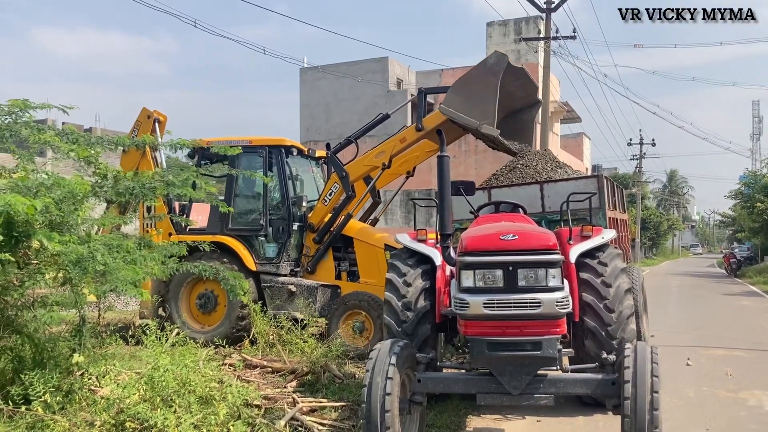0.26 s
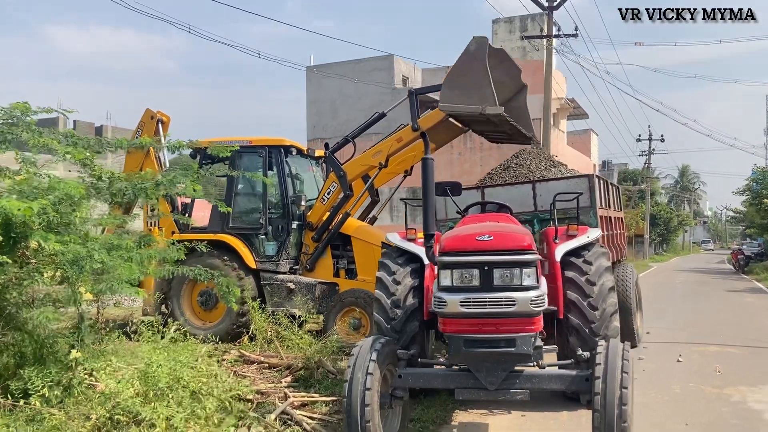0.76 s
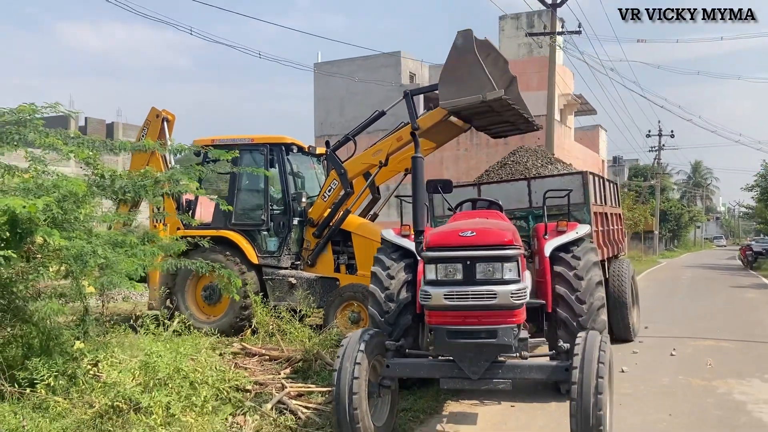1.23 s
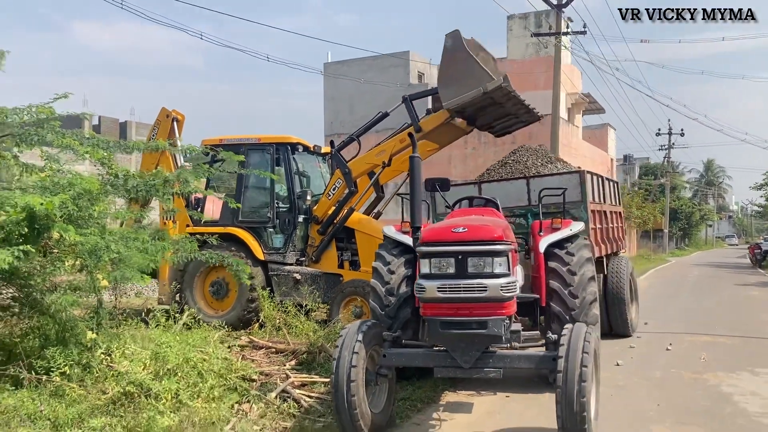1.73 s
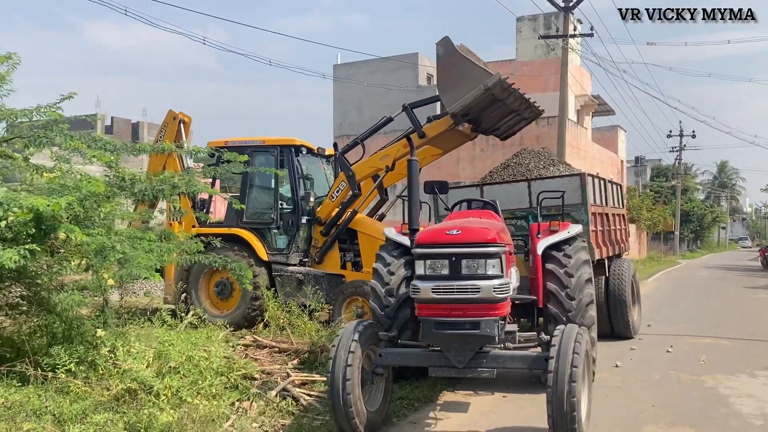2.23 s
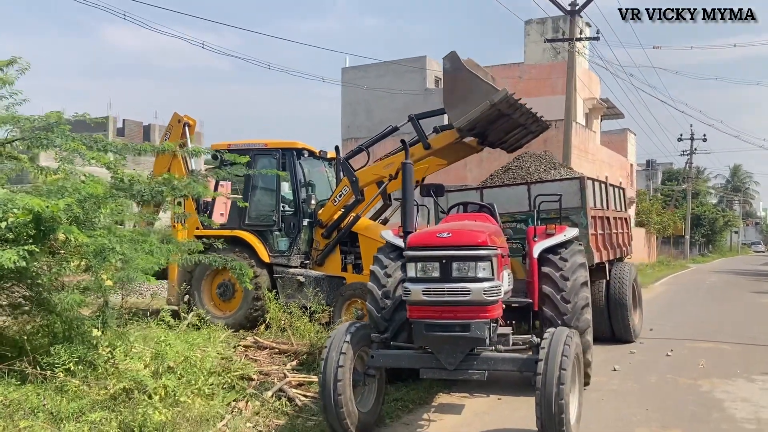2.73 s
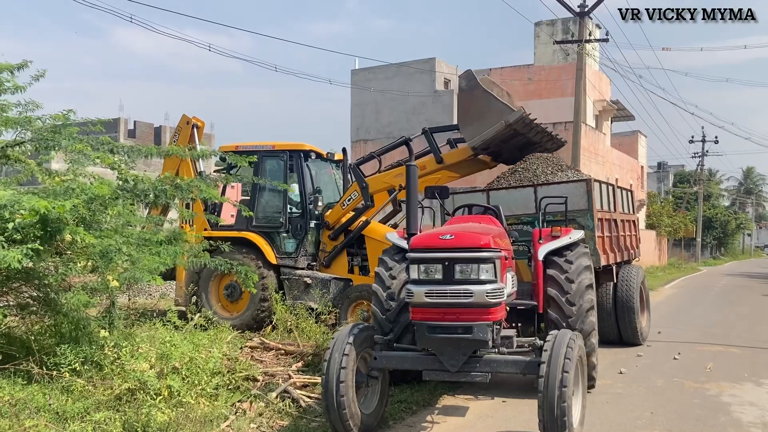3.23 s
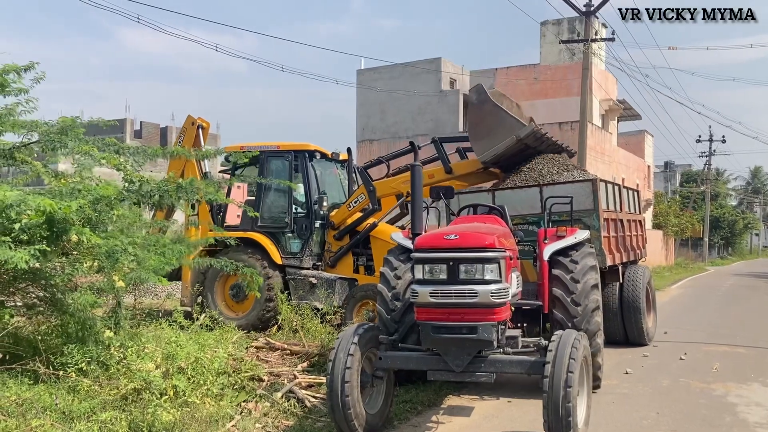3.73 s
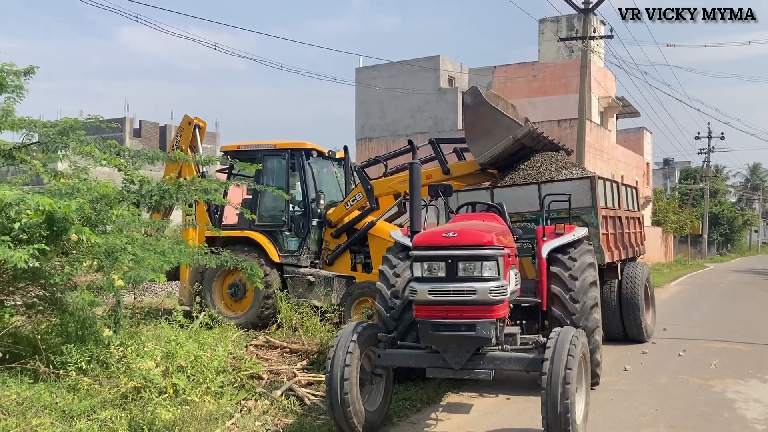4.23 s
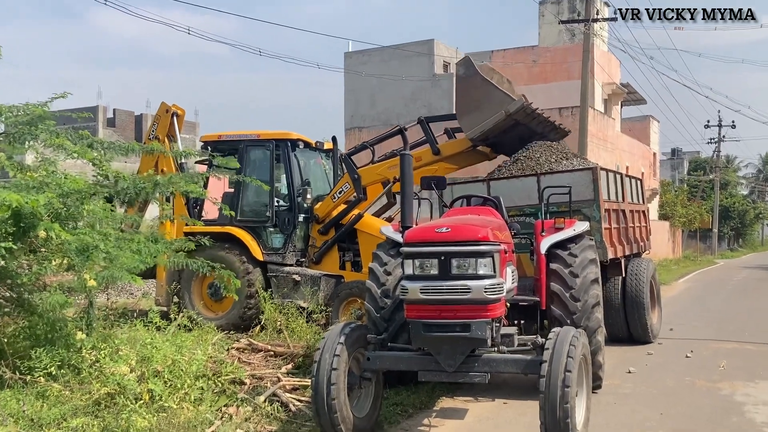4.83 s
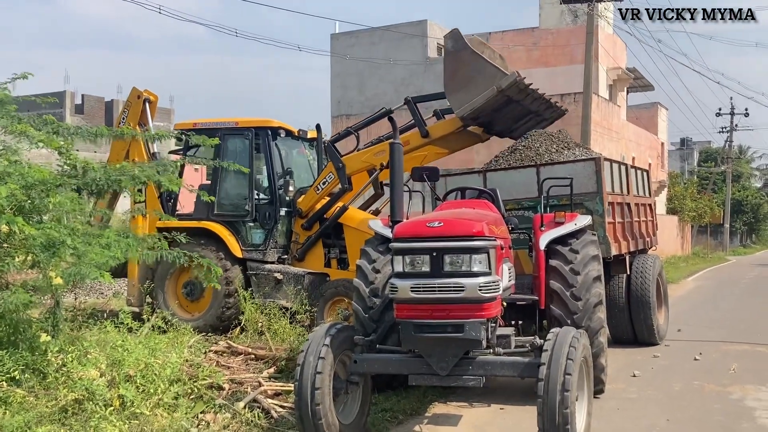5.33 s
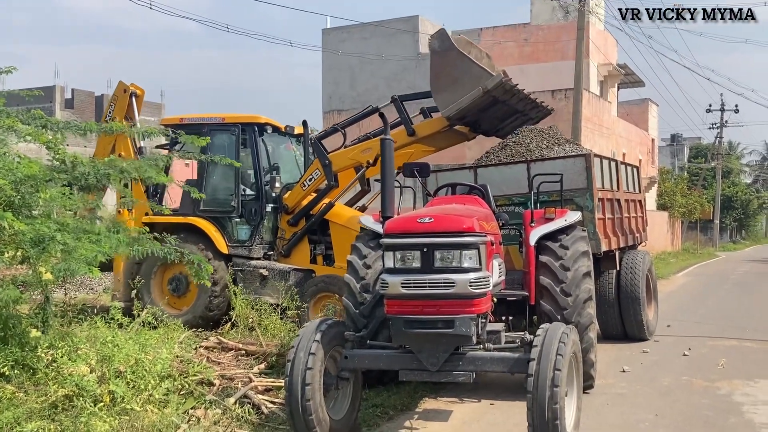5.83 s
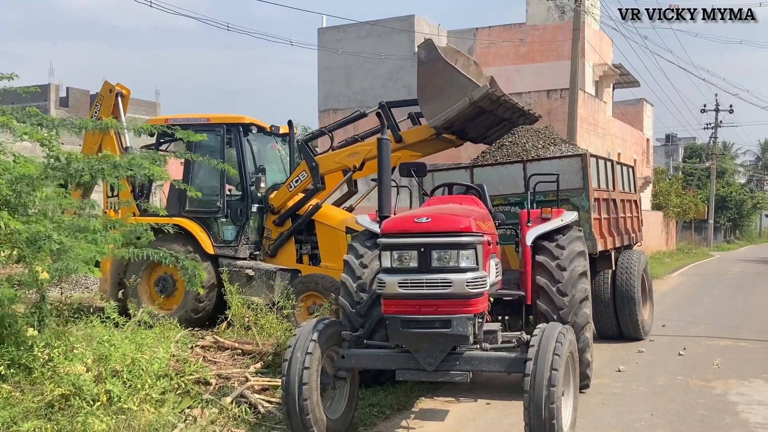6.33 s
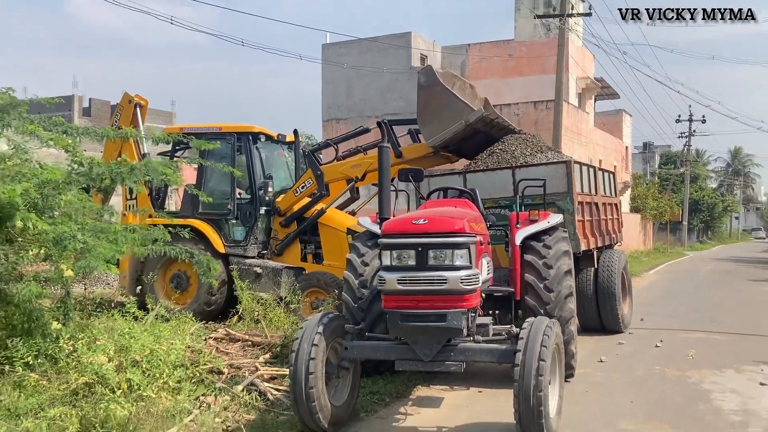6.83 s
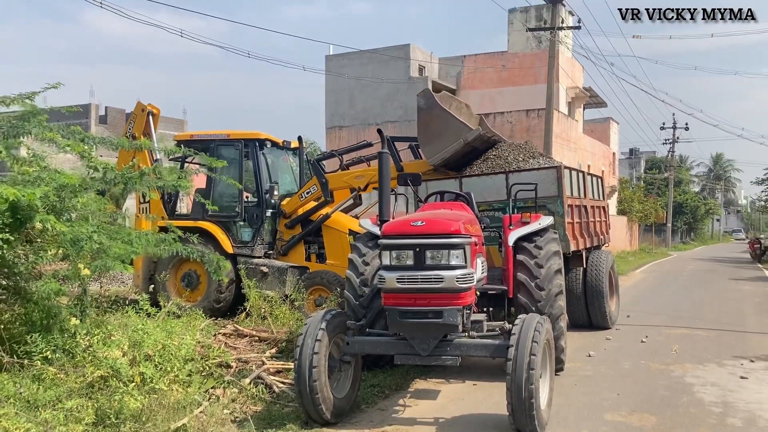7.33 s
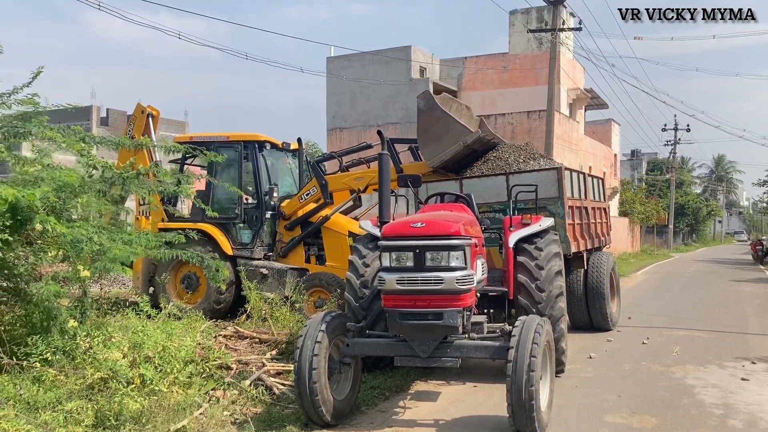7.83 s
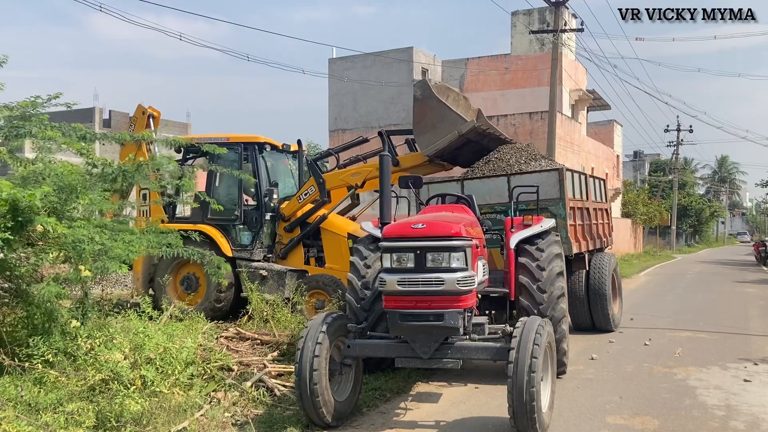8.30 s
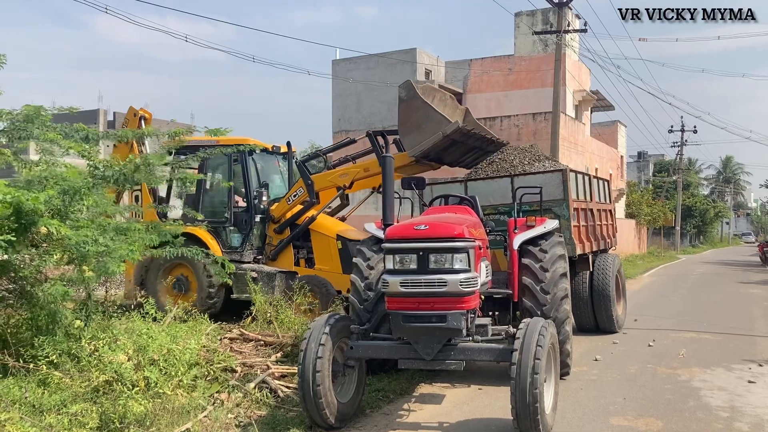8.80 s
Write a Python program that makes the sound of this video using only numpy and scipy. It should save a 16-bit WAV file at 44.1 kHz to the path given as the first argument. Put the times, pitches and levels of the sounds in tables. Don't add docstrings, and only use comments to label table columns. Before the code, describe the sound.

Close outdoor stereo sound of a loader's four-cylinder diesel beside a road. From 0 s it idles lumpily at about thirty firings a second: deep exhaust throb, low frame rumble, knocking block, ticking valves and a regular metallic pump ping. A scrape and little bursts of trickling stones come in the first second. At about 1.8 s the engine revs, with panel knocks, a thud, quick clanks at 2.2 s and a longer hiss of stones, then eases by 3 s. Bucket steel clanks at 3.6 to 4.5 s, with a heavy jolt at 4.2. A sharper rev at 5 s brings knocks and sliding stones, falling to slow idle by 6.2. Dull jolts continue; a bright cluster of clanks sounds at 7.3 s, more near 7.9. From 8 s the engine climbs strongly, stones hissing and loose panels banging rapidly until the end at about 9 s.

```python
import sys
import numpy as np
from scipy import signal
from scipy.fft import rfft, irfft, next_fast_len
from scipy.io import wavfile
from scipy.ndimage import uniform_filter1d, map_coordinates

SR = 44100
rng = np.random.default_rng(int(sys.argv[2]) if len(sys.argv) > 2 else 0)


def rack_gain(trim_db):
    fader = np.asarray(trim_db, float)
    return 10 ** (fader / 20)


def master_out(mix):
    frames = np.transpose(np.atleast_2d(mix))
    ceiling = np.clip(frames, -1, 1)
    pcm = np.round(ceiling * 32767).astype(np.int16)
    wavfile.write(sys.argv[1], SR, pcm)


N = 399546
TIME = np.arange(N) / SR
COARSE = np.arange(0, N / SR + .01, .001)

# time_s, firing_rate_hz
SPEED = [(0, 30.37), (.7, 29.68), (1.68, 29.96), (1.86, 36.64), (2.26, 36.89), (3.19, 32.27), (4.17, 32.28),
         (4.9, 30.54), (5.09, 38.42), (5.43, 39.54), (5.97, 34.39), (6.22, 28.88), (7.6, 28.67),
         (8.0, 27.66), (8.25, 37.31), (8.5, 42.97), (8.7, 47.5), (9.06, 50.7)]
# start_s, hold_s, load_db
PEDAL = [(0, 1, 1.5), (1.72, 0.17, 6), (2.2, 0.25, -5), (4.3, 0.23, -10), (4.68, 0.067, 2),
         (4.985, 0.1, 9.5), (5.15, 0.17, -1.5), (5.3, 0.31, -21), (5.76, 0.065, 3), (5.93, 0.51, -3),
         (7.92, 0.13, 4.5), (8.09, 0.48, 8.5), (8.19, 0.095, 2), (8.6, 0.17, 5), (8.81, 0.11, 9.5),
         (8.97, .2, 8)]
# time_s, depth_db
ECHO_NULLS = [(0, 1), (1.62, -4), (1.85, -4), (2.05, 5), (2.3, 6), (2.55, -8), (2.93, -20), (3.12, -4),
              (4.2, -2), (4.42, 16), (4.8, -1), (5.9, -4.5), (6.12, -13), (6.38, 3), (8.03, 9), (8.15, -3),
              (8.72, -2.5), (8.84, -18)]
# order, level_db (over the 3rd order)
UPPER_ORDERS = [(1.5, -48), (2.5, -32), (3.5, -16.5), (5, -25), (5.5, -27.5), (6, -22), (7, -31.5)]
# order, start_s, hold_s, level_db
SINGING_ORDERS = [(4, 0.2, 1.3, -39), (6, 0.35, 0.38, -44), (7, .2, 0.56, -46), (6, 1.87, 0.69, -44),
                  (5, 1.9, .8, -53), (4, 1.8, .5, -42.5), (5, 3.0, 0.66, -45), (4, 4.2, .3, -46),
                  (6, 5.3, 0.39, -43), (4, 6.5, 1.36, -48), (5, 6.5, 0.93, -42), (7, 7.1, .8, -45),
                  (6, 8.36, 0.096, -31.5), (7, 9.9, .2, -37.5)]
CYLINDERS = [-9.5, -5.5, -8.5, -6.5]
# time_s, level_db
CLATTER = [(0.0, -41), (1.41, -43), (1.71, -42.5), (2.5, -42), (2.98, -43.5), (5.78, -43), (5.98, -44),
           (6.25, -45), (6.45, -43), (6.65, -44), (6.86, -45.5), (7.29, -41.5), (7.6, -44.5), (8.18, -41.5),
           (8.33, -40), (9.06, -36.5)]
# start_s, hold_s, level_db
SHOVES = [(0, 0.14, 0), (.4, 0.42, -2.5), (1.9, 0.36, 3.5), (2.9, 0.022, 5.5), (3.84, 0.13, 4),
          (4.28, 0.36, 7), (5.16, 0.4, 6.5), (6.06, 0.056, 5.5), (6.21, 0.037, 5.5), (6.31, 0.22, -3.5),
          (6.67, 0.064, 4), (5.78, 0.086, 6.5), (6.8, 0.26, 1), (7.2, 0.26, 4.5), (7.55, 0.4, 4.5),
          (7.98, 0.25, -2)]
# start_s, hold_s, level_db
LULLS = [
    (6.3, .3, -5.5),
    (2.3, 1.2, 1.5),
]
# frequency_hz, level_db (per Hz)
RUMBLE_COLOUR = [(20, -120), (28, -70), (45, -3.5), (80, -3.5), (130, -6), (200, -14.5), (300, -19.5),
                 (420, -120)]
# frequency_hz, width_hz, level_db
PANEL_MODES = [(355.2, 18, 0), (551.5, 103, -1.5), (731, 8.2, -14.5), (948.5, 81, -5.5), (1072, 440, -10)]
# frequency_hz, width_hz, level_db
BLOCK_MODES = [(337.9, 20, 8.5), (513.5, 32, -1), (698, 58, 4), (883, 82, -7), (1135.7, 29.3, 2.5),
               (1473.5, 24.3, 0.5), (2105, 47, -2), (2540, 50, -0.5), (3666, 79, -9.5), (4500, 83, -15.5),
               (6350, 28, -14.5)]
# frequency_hz, level_db (per Hz)
ROAR_COLOUR = [(120, -2), (200, -5.5), (413, -15.5), (1120, 0.5), (1290, -8.5), (1490, -1), (1890, -6),
               (2550, -9), (6000, -14), (7800, -101), (13200, -120)]
# frequency_hz, level_db (per Hz)
VALVE_COLOUR = [(2500, -120), (3500, -8.5), (5000, -1), (6500, -8), (9000, -2.5), (12000, -8.5),
                (13500, -1.5), (15500, -14), (16500, -31)]
# frequency_hz, level_db (per Hz)
TAPPET_COLOUR = [(9000, -120), (11500, -8.5), (13400, -15), (15500, -8), (16500, -7.5)]
# time_s, level_db (over the block)
PUMP_LEVEL = [
    (0, 8.5),
    (1.6, -2.5),
    (3.6, -10),
    (6, 3.5),
    (9.06, 4),
]
# frequency_hz, level_db (per Hz)
SLIDE_COLOUR = [(400, -120), (600, 0), (1500, -10), (4000, -3.5), (7000, -6), (11000, -4.5), (14000, -11),
                (16500, -29)]
# start_s, hold_s, level_db (over the faint dust hiss)
POURS = [(0, 0.87, 9), (0, 0.043, 7), (.06, 0.085, 20.5), (.2, 0.16, 9.5), (.36, 0.39, 10.5),
         (.82, 0.042, 12), (1.0, 0.04, 22), (1.27, 0.038, 23), (1.9, 1.14, 16), (3.5, 0.063, 21.5),
         (5.0, 0.06, 27), (5.2, 0.73, 16), (8.12, 1, 13.5), (8.7, 0.18, 13.5)]
# time_s (middle of the scrape), level_db, rise_s, ringing_hz, body_db
CLANKS = [(.13, -39.5, .025, 780, 8), (0.835, -42, .002, 860, 8), (2.149, -47, 0.002, 2040, -6),
          (2.167, -38, 0.0018, 2050, -4), (2.179, -48, .002, 2400, -8), (2.19, -44, 0.019, 1590, 0),
          (2.206, -43, 0.0026, 2430, -4), (2.215, -45, 0.002, 2180, -8), (3.6, -44.5, 0.05, 3000, 11),
          (3.856, -33, 0.013, 3900, 4.5), (3.99, -42.5, 0.0086, 2224, 0), (4.33, -38, 0.0052, 4500, 1),
          (4.333, -44, 0.0038, 6370, -6), (4.347, -42, 0.011, 7160, 8), (4.398, -37, 0.0062, 2544, 0),
          (4.402, -44, .006, 3500, -5), (4.418, -38, .016, 3300, 6), (4.441, -36.5, 0.0045, 2520, 8),
          (4.443, -39, .007, 1790, 4), (4.46, -37, .008, 710, 10), (7.252, -43, 0.002, 1490, 22),
          (7.283, -31.5, 0.0097, 3880, 13), (7.292, -33, 0.0056, 3080, -7), (7.297, -31.5, .005, 2000, -5),
          (7.308, -43.5, .008, 6370, 3), (7.319, -33.5, 0.009, 2110, 11), (7.357, -43.5, 0.0052, 4010, 0),
          (7.846, -35.5, 0.012, 6370, 4), (7.971, -41, 0.014, 3450, 11)]
# frequency_hz, width_hz, level_db
STEEL_MODES = [(274, 110, -4.5), (429, 35, 4.5), (650, 44, -3.5), (860, 120, -1), (1470, 100, -8),
               (1980, 104, 3), (3230, 100, -8), (3980, 110, 2), (5190, 120, -9), (6370, 82, -5),
               (2610, 47, -11.5), (7750, 120, -3), (12600, 140, -13), (12400, 220, -15)]
# time_s, peak_db, pitch_hz
THUDS = [(0.432, -40, 72.7), (0.502, -37, 62.6), (1.578, -27, 86.1), (2.008, -9, 113), (2.455, -30, 70.0),
         (2.708, -31, 76.4), (4.218, -5, 78.9), (4.32, -29, 61.2), (5.003, -20, 78.1), (5.23, -27, 126),
         (5.409, -4, 79), (5.57, -13, 146), (6.015, -9, 89.6), (6.212, -22, 76.1), (6.695, -7, 150),
         (7.159, -19, 83.6), (7.693, -8, 132)]
# time_s, peak_db, upper_db (upper modes over middle), hold_s
KNOCKS = [(1.748, -27.5, 2, 0.048), (1.836, -23, -6, 0.042), (5.002, -17, -5, 0.029),
          (5.026, -23, 0, 0.058), (5.084, -21.5, -9, 0.054), (5.78, -44, -21, 0.027),
          (7.958, -30, -5, 0.022), (8.024, -25, -5.5, 0.018), (8.059, -26, -1, 0.018),
          (8.093, -19.5, -5, 0.05), (8.151, -14, 3, 0.023), (8.211, -17, -2, 0.038),
          (8.265, -12.5, -1, 0.031), (8.295, -25, -13, 0.024), (8.343, -16, -6, 0.041),
          (8.42, -36, 3, 0.03), (8.464, -20, 2, 0.038), (8.511, -26.5, 10.5, 0.041),
          (8.56, -11.5, -11, 0.031), (8.6, -14.5, -5, 0.027), (8.642, -18, 1, 0.016),
          (8.651, -14, -9, 0.044), (8.73, -15.5, -3, 0.048), (8.811, -13, 1, 0.012), (8.85, -26, 7, 0.023),
          (8.885, -23, 6, 0.029), (8.915, -20, 5.5, 0.05), (8.971, -12.5, 2.5, 0.026),
          (9.036, -26.5, 6, 0.058)]
# frequency_hz, level_db
PANEL_DIPS = [(760, 0), (830, -12), (900, 0), (1230, 0), (1320, -10), (1420, -3)]
# frequency_hz, lead_rad
LEAD = [(0, 0), (1720, .75), (2410, .45), (4200, 1.7), (5200, 2.8), (5700, 3.1), (6150, 2), (6500, .5),
        (6900, 0), (15700, -4 * np.pi)]
# frequency_hz, level_db
TILT = [(60, -2), (110, -1), (200, -1), (380, 1), (700, 1), (1290, 3.5), (2380, 3), (4400, -1.5),
        (8120, -2.5), (15000, -0.5)]
# frequency_hz, likeness_ratio
ALIKE = [(40, .86), (600, .86), (3000, .72), (5000, .74), (6000, .78), (7000, .9), (8500, .94),
         (11000, .88), (13500, .94), (15500, .86)]

PRESS_S, LIFT_S = 0.045, 0.075
IDLE_HZ, TONE_DB = 30.74, -28
FIRST_DB, FIRST_DB_PER_HZ, FIRST_LOAD = -55.5, 1.88, 0.45
FIRST_FULL_HZ = 43.7
FOURTH_DB, LOPE_DB_PER_HZ, FOURTH_LOAD = -54.5, 8, 0.52
PIPE_S = .035
SLIP_FROM_HZ, SLIP_OVER_HZ, SLIP_RAD = 31, 5, 2.2
SING_FADE_S = 0.094
USUAL_DB = -43
RUMBLE_DB, RUMBLE_LOAD = -34, 0.94
BOOM_DB, BOOM_CLATTER, BOOM_LOAD, SHOVE_BOOM = -37.5, 1, 1.2, 0.99
VALVE_DB, VALVE_CLATTER, VALVE_LOAD = -51, 1, 0.25
BLOCK_LOAD = 0.22
UNEVEN_DB, ALTERNATE_DB, RAP = 1.0, 1.2, 6.5
LAG_CYCLES = 4
TAPPET_STEADY = 0.94
PING_HZ, PING_AT, PING_LENGTH = 1183, 0.64, 0.31
ECHO_PING_AT, ECHO_PING_DB = 3.8, -3.5
DUST_DB, POUR_RISE_S, POUR_FALL_S = -65, 0.054, 0.12
TREBLE_DB, TREBLE_DB_PER_OCTAVE = -5, 1.5
DULL_DB_PER_OCTAVE = 14
RING_DB, RING_T60_S = -3, .03
LOW_CUT_HZ = 42
LOW_MODE_DB = -9
EARLY_S = .003
TOP_HZ = 15880


def unit(x):
    return x / np.sqrt(np.mean(x ** 2) + 1e-20)


def along(points, hz):
    f, v = np.transpose(points)
    return np.interp(np.log(hz + 1), np.log(f + 1), v)


def curve(rows):
    return np.interp(TIME, *np.transpose(rows))


def swells(rows, rise, fall):
    total = 0
    for start, hold, db in rows:
        rising = (COARSE - start) / rise + .5
        falling = (start + hold - COARSE) / fall + 1
        total = total + db * np.clip(np.minimum(rising, falling), 0, 1)
    return np.interp(TIME, COARSE, total)


def wobble(rate):
    knots = rng.standard_normal(int(N * rate / SR) + 4)
    return np.interp(TIME, COARSE, map_coordinates(knots, [COARSE * rate]))


def filtered(x, response):
    m = next_fast_len(N + SR // 2)
    return irfft(rfft(x, m) * response(np.fft.rfftfreq(m, 1 / SR)), m)[..., :N]


def modes(peaks):
    def response(f):
        total = 0
        for k, (hz, width, db) in enumerate(peaks):
            total = total + (-1) ** k * rack_gain(db) * 1j * f * width / (hz * hz - f * f + 1j * f * width)
        return total
    return response


def resonator(x, hz, width, db):
    return rack_gain(db) * signal.lfilter(*signal.iirpeak(hz, hz / width, SR), x)


def coloured(points):
    return lambda f: rack_gain(along(points, f))


def coloured_noise(points):
    return unit(filtered(rng.standard_normal((2, N)), coloured(points)))


def firings():
    return np.cumsum(curve(SPEED)) / SR + 1.14


def puffs(decay, floor_db, scatter_db, size=90):
    turn = firings()
    shot = turn.astype(int)
    size_db = np.asarray(CYLINDERS)[shot % 4] + scatter_db * rng.standard_normal(shot[-1] + 1)[shot]
    gate = rack_gain(floor_db) + rack_gain(size_db) * np.exp(-(turn - shot) / decay)
    return uniform_filter1d(gate, size=size) * rng.standard_normal((2, N))


def levels():
    load = np.maximum(swells(PEDAL, PRESS_S, LIFT_S), 0)
    shove = swells(SHOVES, PRESS_S, LIFT_S)
    extra = curve(CLATTER) - USUAL_DB
    rumble_db = RUMBLE_DB + RUMBLE_LOAD * load + shove
    boom_db = BOOM_DB + BOOM_LOAD * load + BOOM_CLATTER * extra + SHOVE_BOOM * shove
    block_db = USUAL_DB + extra + BLOCK_LOAD * load
    valve_db = VALVE_DB + VALVE_CLATTER * extra + VALVE_LOAD * load
    return rumble_db, boom_db, block_db, valve_db


def exhaust():
    rate, null = curve(SPEED), curve(ECHO_NULLS)
    load = swells(PEDAL, PRESS_S, LIFT_S)
    first_db = FIRST_DB + FIRST_DB_PER_HZ * (np.minimum(rate, FIRST_FULL_HZ) - IDLE_HZ) + FIRST_LOAD * load
    second_db = TONE_DB + load - np.maximum(null, 0)
    third_db = TONE_DB + load + np.minimum(null, 0)
    fourth_db = FOURTH_DB + LOPE_DB_PER_HZ * np.maximum(IDLE_HZ - rate, 0) + FOURTH_LOAD * load
    phase = 2 * np.pi * np.interp(TIME - PIPE_S, TIME, firings())
    slip = SLIP_RAD * np.clip((rate - SLIP_FROM_HZ) / SLIP_OVER_HZ, 0, 1)
    tone = np.zeros(N)
    for order, db in enumerate([first_db, second_db, third_db, fourth_db], 1):
        angle = order * (phase + 2.7 + .1 * wobble(8)) - .9 + (order == 3) * slip
        tone += rack_gain(db + .8 * wobble(11)) * np.sin(angle)
    for order, db in UPPER_ORDERS:
        pipe_db = 3 * np.exp(-((order * rate - 240) / 16) ** 2)
        level = rack_gain(third_db + db + pipe_db + 3.4 * wobble(4))
        tone += level * np.sin(order * phase + 0.5 * wobble(4.3))
    for order, start, hold, db in SINGING_ORDERS:
        shape = swells([(start, hold, 1)], SING_FADE_S, SING_FADE_S)
        tone += shape * rack_gain(db + 2.5 * wobble(9)) * np.sin(order * phase + .7 * wobble(7))
    reflection = .8 * np.roll(tone, 190) * wobble(11)
    return np.sqrt(2) * np.array([tone, reflection])


def rumble():
    return coloured_noise(RUMBLE_COLOUR) * rack_gain(levels()[0] + 1.5 + 2.2 * wobble(22))


def boom():
    gap = [(780, 3.5), (840, -28), (900, 2.0)]
    ringing = unit(filtered(puffs(0.95, 21, 3.3), lambda f: modes(PANEL_MODES)(f) * rack_gain(along(gap, f))))
    return ringing * rack_gain(levels()[1] - 9.0 + 0.13 * wobble(12))


def block():
    block_db = levels()[2]
    ring_puffs, roar_puffs = puffs(.26, -14, 1.4, size=160), puffs(.28, -10, 1.5, size=260)
    shot = firings().astype(int)
    count = np.arange(shot[-1] + 1)[:, None]
    uneven_db = UNEVEN_DB * rng.standard_normal((len(count), len(BLOCK_MODES)))
    luck = rack_gain(uneven_db + ALTERNATE_DB * (-1) ** count)
    rapped = ring_puffs + RAP * np.diff(shot, prepend=0) * [[1], [-1]]
    ring = np.zeros((2, N))
    for k, (hz, width, db) in enumerate(BLOCK_MODES):
        delayed = np.roll(luck[shot, k] * rapped, int(LAG_CYCLES * SR / hz), axis=1)
        ring += (-1) ** k * rack_gain(1.4 * wobble(6)) * resonator(delayed, hz, width, db)
    roar = unit(filtered(roar_puffs, coloured(ROAR_COLOUR)))
    calm_db = .7 * np.clip(block_db + 42, 0, 12)
    roar_db = -1.5 - calm_db + swells(LULLS, PRESS_S, LIFT_S)
    return (unit(ring) + rack_gain(roar_db) * roar) * rack_gain(block_db + 4.0 + .5 * wobble(9))


def valves():
    ticks = unit(filtered(puffs(.28, -9.5, 2.6), coloured(VALVE_COLOUR)))
    return ticks * rack_gain(levels()[3] + swells(LULLS, PRESS_S, LIFT_S) + 4.5 + 1.4 * wobble(8.6))


def tappets():
    ticks = unit(filtered(puffs(.22, -16, 4.5), coloured(TAPPET_COLOUR)))
    tick_db = levels()[3] - TAPPET_STEADY * (curve(CLATTER) - USUAL_DB)
    return ticks * rack_gain(tick_db + 2.0 + 0.96 * wobble(13))


def pump():
    turn = firings()
    size_db = 2 * rng.standard_normal(int(turn[-1]) // 4 + 1)[turn.astype(int) // 4]
    shape = np.exp(-((turn % 4 - PING_AT) / PING_LENGTH) ** 2)
    shape += rack_gain(ECHO_PING_DB) * np.exp(-(2 * (turn % 4 - ECHO_PING_AT) / PING_LENGTH) ** 2)
    level = rack_gain(levels()[2] + curve(PUMP_LEVEL) + size_db)
    return level * shape * np.sin(2 * np.pi * PING_HZ * TIME) * [[1], [.3]]


def stones():
    pour_db = swells(POURS, POUR_RISE_S, POUR_FALL_S)
    return coloured_noise(SLIDE_COLOUR) * rack_gain(DUST_DB + pour_db + 0.56 * wobble(8.8))


def bucket():
    out, age = np.zeros((2, N + SR)), np.arange(SR // 4) / SR
    hz = np.fft.rfftfreq(len(age), 1 / SR)
    steel = modes(STEEL_MODES)(hz) + rack_gain(-14)
    low = 1 / (1 + 1j * hz / 3600) ** 2
    for s, db, rise, ring_hz, body_db in CLANKS:
        late = (age - 3 * rise) / rise
        grit = rng.standard_normal((2, len(age))) * (1 + 1.5 * (rng.random(len(age)) < .02))
        sharp_shape = np.exp(np.where(late < 0, late, -1.3 * late)) * (1 + 0.3 * np.exp(-(late / 0.4) ** 2))
        dull_shape = np.exp(np.where(late < 0, -.5 * late ** 2, -late / 3.2))
        scrape = rfft(grit * sharp_shape) * (1 - low) + rfft(grit * dull_shape) * low
        treble_db = TREBLE_DB + TREBLE_DB_PER_OCTAVE * np.log2(ring_hz / 3000)
        dull_db = DULL_DB_PER_OCTAVE * min(np.log2(ring_hz / 3400), 0)
        colour = [(500, body_db), (2500, 0), (4000, dull_db), (9000, treble_db), (13000, treble_db),
                  (15500, treble_db - 13)]
        body = steel + modes([(ring_hz, 150, 2)])(hz)
        clank = irfft(rack_gain(along(colour, hz)) * body * scrape, len(age))
        clank = clank / np.sqrt(np.sum(clank[0] ** 2) / (2 * rise * SR))
        after = np.maximum(age - 2.5 * rise, 0)
        struck = rack_gain(RING_DB - 60 * after / (RING_T60_S + 4 * rise)) * np.sin(2 * np.pi * ring_hz * after)
        if rise < .01:
            clank = clank + struck * [[1], [.3]]
        at = round((s - 3 * rise) * SR)
        out[:, at:at + len(age)] += rack_gain(db + 7.5) * clank
    return out[:, :N]


def jolts():
    out, age = np.zeros(N + SR), np.arange(SR // 8) / SR
    for s, db, hz in THUDS:
        shape = rack_gain(db - 2.0 - 60 * age / 0.031) * (1 - np.exp(-age / 0.00057))
        out[round(s * SR):][:len(age)] += shape * np.sin(2 * np.pi * hz * age)
    return filtered(out[:N], lambda f: (1j * f / (LOW_CUT_HZ + 1j * f)) ** 3) * [[1], [.3]]


def panels():
    out, age = np.zeros((2, N + SR)), np.arange(SR // 6) / SR
    hz, _, mode_db = np.transpose(PANEL_MODES)[..., None]
    for s, db, upper_db, hold in KNOCKS:
        shape = (1 - np.exp(-age / 0.0013)) * np.exp(-(age / hold) ** 3)
        balance_db = np.array([LOW_MODE_DB, 0, 0, upper_db + 2.0, upper_db + 2.0])[:, None]
        level = rack_gain(db - 6.5 + mode_db + balance_db)
        pitch = rng.normal(1, 0.012, hz.shape)
        start = rng.random((2,) + hz.shape) * [[[.25]], [[1]]]
        ring = np.sum(level * np.sin(2 * np.pi * (hz * pitch * age + start)), axis=1)
        crack = rack_gain(db - 16.5 - 60 * age / 0.059) * rng.standard_normal(len(age))
        crack += rack_gain(db + 1 - 60 * age / 0.055) * resonator(rng.standard_normal(len(age)), 570, 700, 0)
        at = round((s - EARLY_S) * SR)
        out[:, at:at + len(age)] += shape * ring + crack
    return filtered(out[:, :N], coloured(PANEL_DIPS))


def ports(parts, lead):
    def turn(hz):
        return np.arccos(np.clip(along(ALIKE, hz), 0, 1)) / 2

    def half(hz):
        return rack_gain(along(TILT, hz) / 2) * np.exp(.5j * lead(hz))

    direct, diffuse = filtered(parts, lambda hz: [np.cos(turn(hz)), np.sin(turn(hz))])
    pair = np.array([direct + diffuse, direct - diffuse])
    return filtered(pair, lambda hz: [half(hz), 1 / half(hz)])


def drop_weaker(x):
    z = signal.stft([x[0] + x[1], x[0] - x[1]], nperseg=2048)[2]
    bands = z[:, :1024].reshape(2, 128, 8, -1)
    power = uniform_filter1d(np.sum(abs(bands) ** 2, axis=2), size=2, axis=1)
    level = 10 * np.log10(power + 1e-20)
    faint = level[0, 2:8].mean(axis=0) - level[:, 24:36].mean(axis=(0, 1))
    need_db = 0.13 * (faint - faint.mean()) + 3.5 * np.linspace(-1, 1, len(faint))
    flutter_db = 3.2 * rng.standard_normal(len(faint))
    margin_db = 7.35 + flutter_db - need_db * (np.arange(128) < 37)[:, None]
    keep = level > level[::-1] - margin_db
    keep[:, :22] = True
    z[:, :1024] *= np.repeat(keep, 8, axis=1)
    mid, side = signal.istft(z, nperseg=2048)[1][:, :N] / 2
    return np.array([mid + side, mid - side])


def scene():
    def lead(hz):
        return np.interp(hz, *np.transpose(LEAD))

    def bucket_lead(hz):
        return lead(hz) * np.where(hz < 6900, .3, 1)

    engine = exhaust() + rumble() + boom() + block() + valves() + tappets() + pump()
    machine = engine + stones() + jolts() + panels()
    return ports(machine, lead) + ports(bucket(), bucket_lead)


def low_pass(x):
    return signal.sosfilt(signal.butter(12, 17100, fs=SR, output="sos"), x)


def record(dry):
    band = filtered(dry, lambda hz: hz < TOP_HZ)
    mix = drop_weaker(band)
    return low_pass(mix)


dry = scene()
out = record(dry)
master_out(out)
```